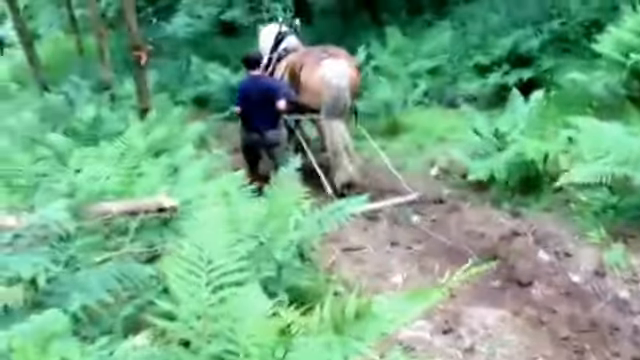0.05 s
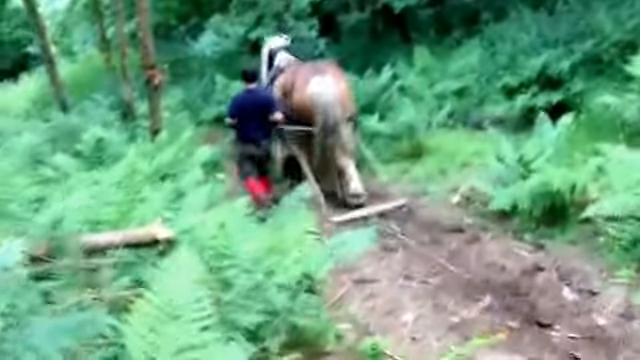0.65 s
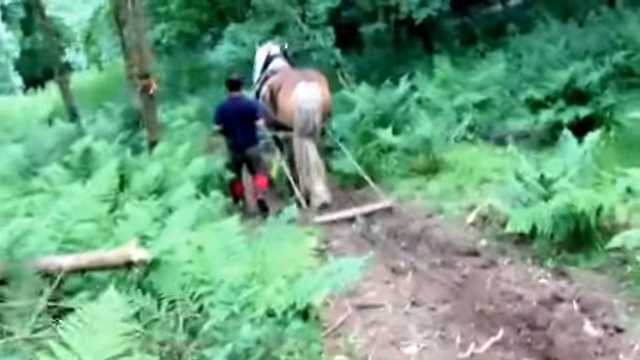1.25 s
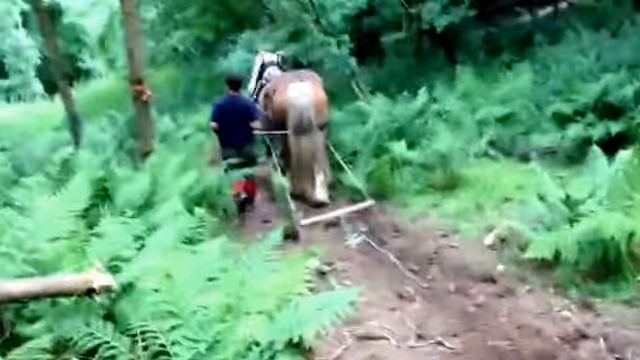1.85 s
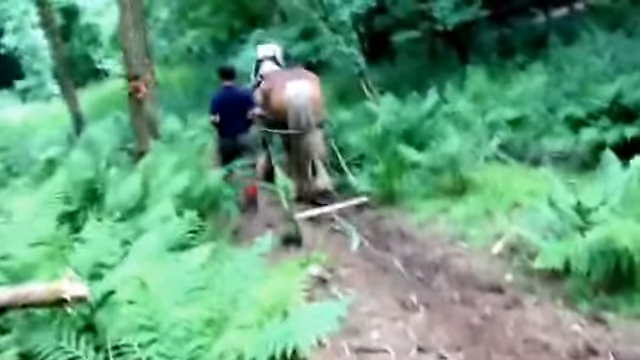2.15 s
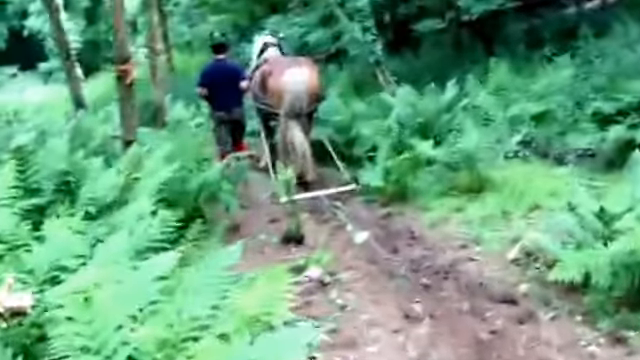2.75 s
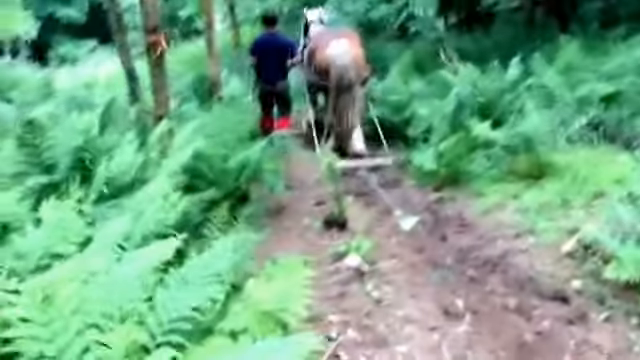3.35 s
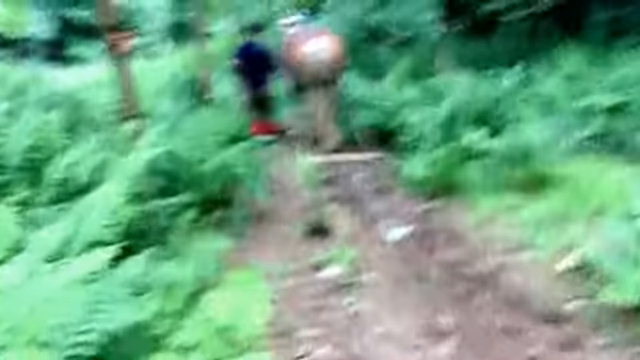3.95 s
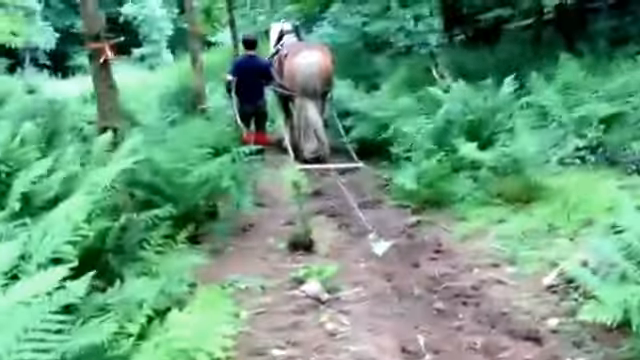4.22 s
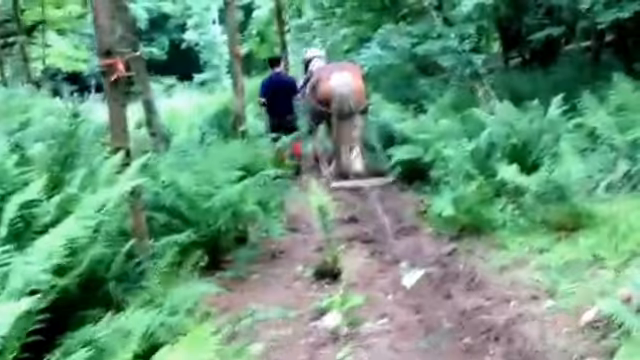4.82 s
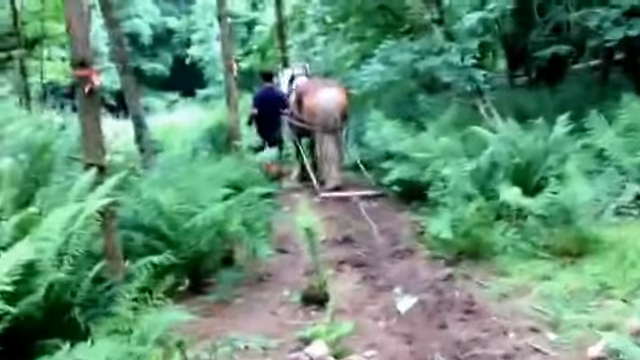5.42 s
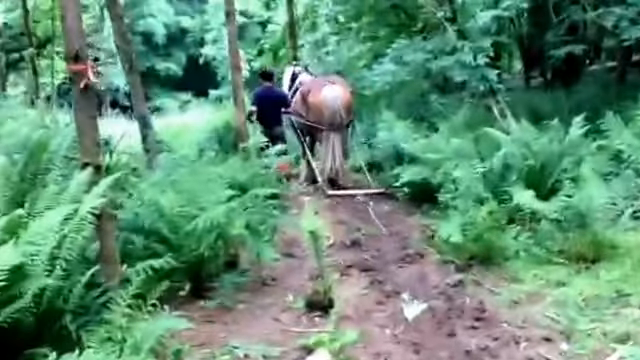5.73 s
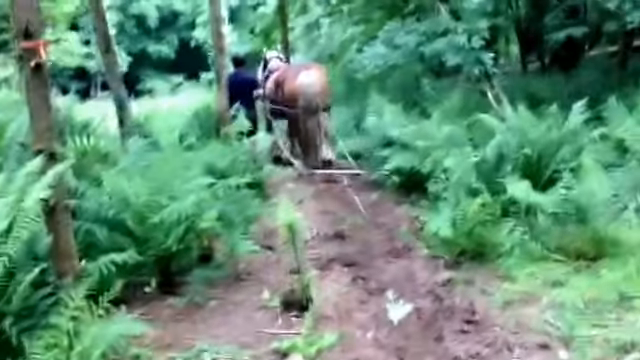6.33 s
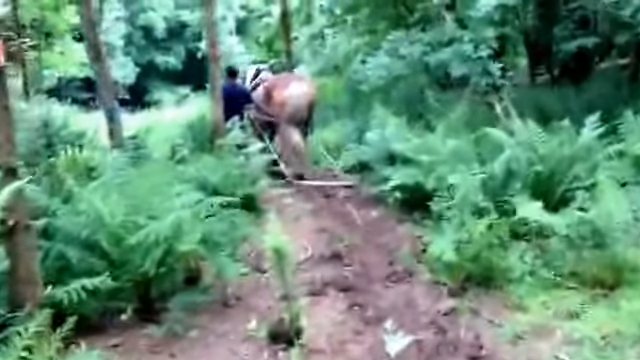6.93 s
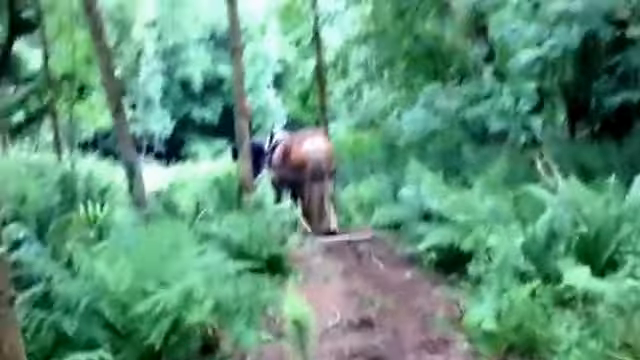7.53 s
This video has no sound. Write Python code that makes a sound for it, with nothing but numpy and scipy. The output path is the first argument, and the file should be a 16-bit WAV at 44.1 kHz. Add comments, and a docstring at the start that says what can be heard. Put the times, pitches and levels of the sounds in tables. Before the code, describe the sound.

A horse drags a wooden bar on chains along a woodland dirt track, moving away from the microphone. From the start, the bar and its iron hook clack irregularly on stones, with sharp knocks around 0.1, 0.8 and 1.7 seconds. Chain links rattle in quick, bright jerks, and a harness ring, clip and buckle add thin, high chimes. The jingling is busiest from about 1.6 to 3 seconds, peaking near 2.9. Underneath, hooves thud softly and unevenly on earth, and soil crunches under the sliding bar. After about 4 seconds the knocks and jingles become sparser and quieter. One louder cluster of wooden clacks and chain rattle comes at about 6.3 seconds, followed by faint thuds and a few light clinks until about 7.5 seconds. The trees give a slight, short echo, and leaves rustle faintly throughout.

```python
"""On a dirt track in a wood, a draught horse walks away, dragging a wooden spreader bar on trace chains.
Impacts on stones excite the resonances of the bar and its iron hook, and each blow ploughs up soil.
Chain links collide and ring as they swing; a harness ring, a clip and a buckle chime in free vibration.
Hooves thud on soft ground, and trunks scatter the sound over a faint rustle of leaves."""
import sys
import numpy as np
from scipy import signal
from scipy.fft import rfft, irfft
from scipy.io import wavfile
from scipy.ndimage import uniform_filter1d

SR = 44100
rng = np.random.default_rng(int(sys.argv[2]) if len(sys.argv) > 2 else 0)


def wav_record(signal):
    """Record a signal, one row per channel, as 16-bit PCM in the file named by sys.argv[1]."""
    frames = np.transpose(np.atleast_2d(signal))
    bounded = np.clip(frames, -1, 1)
    # unit amplitude maps onto the largest positive 16-bit level
    quanta = np.round(bounded * 32767).astype(np.int16)
    wavfile.write(sys.argv[1], SR, quanta)


N = 334278
TIME = np.arange(N) / SR

# Blows on stones. Each row: start in seconds, hook level in dB, bar level in dB, treble tilt in dB,
# chatter in dB. Levels in all tables are relative.
STONE_BLOWS = [(0.078, -44, -39, 8, -18), (0.133, -29, -32.5, 3, -12), (0.1991, -43, -36.5, -1, 13),
               (0.22, -34.5, -52, 0.5, -1), (0.235, -42, -37, -15, -3), (0.314, -34, -38, -9, -14.5),
               (0.6065, -40.5, -34, -14, -7), (0.636, -40, -46, -12, -8), (0.766, -37.5, -38.5, -2.5, 5),
               (0.8072, -39.5, -47, 2, 19), (0.835, -34, -48, 3, -4), (0.8468, -25.5, -36.5, -3.5, -18),
               (0.863, -34.5, -39.5, -0.5, 5), (0.9162, -33, -42, 1, 1), (1.293, -43, -47, -6, -16),
               (1.4014, -39.5, -49, 2.5, -18), (1.423, -32, -43.5, -2.5, -15), (1.455, -34, -45.5, -2, -28),
               (1.6337, -37, -43, -9.5, 8), (1.665, -39, -39, -6, -10), (1.703, -23.5, -34, -2.5, 17),
               (1.7828, -35, -59, -1.5, -19), (1.8733, -40, -53, -2, -4), (1.9618, -38.5, -56, 10, 1),
               (1.9943, -32.5, -53, 8, -2), (2.0065, -30, -39, -1, -1), (2.1171, -35, -47, -1.5, -1),
               (2.2716, -43.5, -50.5, -1.5, -1), (2.317, -35.5, -46.5, 1, 4), (2.365, -34.5, -45, 3.5, -8),
               (2.442, -41.5, -62, 5, -1), (2.8585, -33, -46, 5.5, -16), (2.8765, -30, -40, -4, -0.5),
               (2.9872, -35, -55, 6.5, -4), (3.004, -32, -47, 3.5, -4), (3.031, -38, -48, -12, -13),
               (3.0854, -36.5, -45, -8, -0.5), (3.4175, -37.5, -47.5, -7, -12),
               (3.4423, -37, -48.5, -4, -16), (3.4546, -33.5, -45, -2.5, -11), (3.5002, -37.5, -69, 5, 4),
               (3.5688, -38.5, -53, -1, -2), (3.653, -41, -53, -6, -6), (3.7486, -35, -48.5, -3, -6),
               (4.0665, -33, -44, 1.5, 0.5), (4.2663, -43.5, -54, 2.5, -8), (4.3055, -43.5, -61, 1.5, -7),
               (4.3802, -46, -51.5, -4, -13), (4.485, -38.5, -53, -8.5, -16), (4.7515, -56, -52.5, -7, -19),
               (4.9662, -50, -51.5, 10, -2), (4.9791, -50.5, -47.5, -13, 9), (5.172, -39.5, -43, -2, -1),
               (5.2168, -49, -46, -11, -9), (5.4462, -46, -50, 5, -16), (5.7215, -44.5, -43.5, 10, -1),
               (5.903, -51, -43, -9, -6), (6.2806, -41, -39, -13, -1), (6.3111, -37.5, -32.5, -1, -8),
               (6.3231, -39.5, -36, -11, 5), (6.3874, -48.5, -48, -13, 2), (6.533, -41, -49, -1.5, -23),
               (7.0472, -48.5, -52, -2.5, -5), (7.3413, -49, -42.5, -5, -9)]
# Modes of the wooden bar and of the iron hook. Each row: frequency in Hz, bandwidth in Hz, gain in dB.
BAR_MODES = [(190, 107, -6), (545, 75, 3.5), (624, 44, 4), (712, 100, 2), (975, 217, 0.5), (1400, 237, -2)]
HOOK_MODES = [(1840, 280, -4), (1847, 128, 4), (2720, 136, -1.5), (3232, 375, 8), (3654, 940, 2),
              (3973, 138, 7), (4170, 620, 0.5), (5050, 2870, -2.5)]
# Spectrum of scraping iron. Each row: frequency in Hz, level in dB.
SCRAPE_SPECTRUM = [(300, -14), (1400, -5), (3400, 2), (5000, 5), (6500, 1), (8200, -2.5), (10500, -8),
                   (14500, -14.5)]
def clacks(crack_s=0.0023, chatter_s=0.0098, rise_s=0.00037, hook_db=-1, bar_db=-1, rebound_db=-3):
    """Impact excitation: a hard contact and a flurry of rebounds drive the modes of bar and hook."""
    out, t = np.zeros(N), np.arange(SR // 8) / SR
    for s, iron_db, wood_db, bright_db, chatter_db in [*STONE_BLOWS, *hops(STONE_BLOWS), *pebbles()]:
        rebounds = unit(contacts(2500, 2.5, size=len(t)))
        chatter = undb(chatter_db + rebound_db) * np.exp(-t / chatter_s) * rebounds
        # a square blow is short and hardly chatters, a glancing one lasts longer
        contact_s = crack_s * undb(0.47 * np.clip(chatter_db, -12, 3))
        crack = np.exp(-t / contact_s) * rng.choice([-1, 1], len(t))
        force = (crack + chatter) * (1 - np.exp(-t / rise_s))
        bar = colour(modal_response(force, BAR_MODES),
                     [(70, -27), (170, -3.5), (260, -0.5), (370, -6.5), (560, -1.5),
                      (1500, -3), (4000, -18)])
        # the hook hangs differently at each blow, so its modes share the force differently
        hook_modes = [(hz, width, db + 2 * rng.standard_normal()) for hz, width, db in HOOK_MODES]
        iron = unit_onset(modal_response(force, hook_modes)) + unit_onset(colour(force, SCRAPE_SPECTRUM))
        # stone gives a brighter contact than soil
        tilt_db = np.clip(bright_db, -10, 10)
        iron = colour(iron, [(500, -28), (1500, -tilt_db), (2100, -tilt_db),
                             (4200, -4.5), (8400, tilt_db)])
        add(out, s, undb(iron_db + hook_db) * unit_onset(iron) + undb(wood_db + bar_db) * unit_onset(bar))
    return out


def hops(blows, flight_s=0.018, hop_db=-8.5):
    """Inelastic rebound: the bar lands again after each blow, the harder the more glancing the blow."""
    for s, iron_db, wood_db, bright_db, chatter_db in blows:
        loss_db = hop_db + min(chatter_db, 0.5)
        yield s + flight_s, iron_db + loss_db, wood_db + loss_db, bright_db, chatter_db + hop_db


def pebbles(per_s=4, start_m=9.5, walk_m_s=0.67, scatter_db=2.5, chatter_db=-5):
    """Spherical spreading: random blows on pebbles weaken as 1 / distance while the horse walks off."""
    count = int(per_s * N / SR)
    for k, (jitter, iron, wood, bright) in enumerate(rng.uniform(-1.1, 1, (count, 4))):
        s = (k + (1 + jitter) / 2) * N / SR / count
        spreading_db = -20 * np.log10(1 + walk_m_s * s / start_m)
        iron_db = -47.5 + spreading_db + scatter_db * iron
        wood_db = -51.5 + spreading_db + scatter_db * wood
        yield s, iron_db, wood_db, 7 * bright, chatter_db


# Jerks on the chains. Each row: start in seconds, level in dB.
CHAIN_JERKS = [(0.134, -33), (0.2155, -34.5), (0.477, -43), (0.5863, -34), (0.801, -34.5), (1.2107, -38),
               (1.4275, -45), (1.6378, -30), (1.754, -29), (1.8072, -35), (1.9606, -35), (2.006, -36),
               (2.0597, -34.5), (2.3286, -32.5), (2.4464, -32), (2.6, -37), (2.791, -34.5), (2.833, -27.5),
               (2.8616, -23), (2.955, -28.5), (2.982, -37), (3.6028, -31), (3.771, -43), (3.888, -45),
               (4.3, -47), (4.172, -45), (4.4474, -43), (4.604, -41.5), (5.1567, -45), (5.577, -46),
               (5.703, -43), (6.3048, -25.5), (6.3235, -29), (6.3935, -39), (6.7462, -47), (6.8018, -46.5),
               (7.279, -41)]
# Idle sway between jerks. Each row: time in seconds, level in dB.
CHAIN_SWAY = [(0.0, -51.5), (0.44, -59), (0.65, -58), (1.52, -62), (1.86, -49.5), (3.04, -63),
              (3.19, -58.5), (3.4, -76), (3.61, -55), (4.08, -63), (4.56, -59), (4.75, -74), (5.45, -64),
              (5.59, -54.5), (6.19, -71.5), (6.54, -55), (6.88, -72), (7.58, -64)]
# Modes of the links. Each row: frequency in Hz, level in dB, 60 dB decay time in seconds.
LINK_MODES = [(7280, -8, .07), (7364, -4, .14), (7438, 0, .13), (7490, -3, .08), (7560, -7, .06),
              (7655, 0, .12), (7700, -4, .07), (7790, -7, .07), (8050, -11, .05), (8348, -10, .12),
              (13038, -24, .15), (14200, -12, .14), (14380, -17, .1), (14659, -22, .15)]
def chains(knocks_per_s=45, jerk_db=-5, settle_s=0.02, tick_db=-9, tick_s=0.0013, rub_db=-12):
    """Collision and friction: swaying links knock and rub, and a jerk sets off a quick run of knocks."""
    sway, jerks = np.zeros(N), np.zeros(N)
    knocks = [chime(LINK_MODES, scatter_db=4, detune=0.004, seconds=0.2) for _ in range(96)]
    t = np.arange(len(knocks[0])) / SR
    # each knock opens with the dry tick of iron on iron
    for knock in knocks:
        tick = colour(rng.standard_normal(len(t)) * np.exp(-t / tick_s), SCRAPE_SPECTRUM)
        knock += undb(tick_db) * peak(knock) * tick / peak(tick)
    for s in rng.uniform(0, N / SR, rng.poisson(knocks_per_s * N / SR)):
        add(sway, s, undb(3.1 * rng.standard_normal()) * knocks[rng.integers(len(knocks))])
    for s, db in CHAIN_JERKS:
        run = np.zeros(SR // 3)
        for lag in np.append(0, np.minimum(rng.exponential(settle_s, size=4), 0.1)):
            i = int(lag * SR)
            run[i:i + len(t)] += np.exp(-lag / settle_s / 2) * knocks[rng.integers(len(knocks))]
        add(jerks, s, undb(db + jerk_db) * run / peak(run))
    slips = grains(per_s=500, spread_db=4.5, low_hz=1330, high_hz=8800, fade_s=0.00098)
    rub = steady(colour(slips, SCRAPE_SPECTRUM), 0.061)
    # each jerk leaves the chains swinging
    swing = stirred(CHAIN_SWAY, CHAIN_JERKS, swell_db=-7, rise_s=0.0082, fall_s=0.048)
    return (steady(sway, 0.079) + undb(rub_db) * rub) * swing + jerks


# Blows on the harness ring. Each row: start in seconds, level in dB, offset of the low modes in dB.
RING_BLOWS = [(0.0875, -30.5, -1), (2.1174, -37.5, -9), (2.3726, -41.5, -4), (2.853, -36.5, 1),
              (2.9415, -37, 6), (3.898, -44, -1), (4.0625, -35, -4.5), (4.4252, -46.5, 1.5),
              (4.4912, -52.5, 6), (5.163, -43.5, 6), (5.1934, -46, 6), (5.525, -57, 6), (6.5256, -55.5, 2),
              (6.646, -58, 6), (7.1457, -53, -2.5), (7.3322, -46.5, -4.5)]
# Modes of the ring. Each row: frequency in Hz, level in dB, 60 dB decay time in seconds.
RING_MODES = [(1637, -15, .5), (1943, -14, .4), (4387, -5, .28), (5683, 0, .27), (5913, -6, .24),
              (5990, -5, .24), (9383, -2, .13), (9530, -2, .14), (10055, -7, .17), (10150, -1, .12),
              (11203, -16, .15), (12613, -20, .18)]
def harness_ring(high_db=-2, low_db=-3, split_hz=8000):
    """Free vibration: the loose ring chimes, each blow weighting its high and low modes differently."""
    out, modes = np.zeros(N), np.array(RING_MODES)
    is_low = modes[:, 0] < split_hz
    for s, db, offset_db in RING_BLOWS:
        for band, band_db in ((modes[~is_low], high_db), (modes[is_low], low_db + offset_db)):
            ringing = chime(band, scatter_db=3, detune=0.0018, seconds=0.5)
            sound = rattle(ringing, bounce_s=0.016, bounce_db=-3.5)
            add(out, s, undb(db + band_db) * sound / peak(sound))
    return out


CLIP_BLOWS = [(0.232, -40), (0.3341, -45.5), (0.497, -42), (0.6406, -37), (0.7462, -36.5), (1.1253, -44.5),
              (1.1648, -46.5), (1.7645, -39), (2.0802, -42), (2.281, -41.5), (4.17, -41), (4.6853, -50),
              (4.7456, -50.5), (4.9573, -44.5), (5.082, -37.5), (5.8047, -38.5)]
BUCKLE_BLOWS = [(4.43, -52), (4.49, -52), (5.16, -48), (5.418, -49), (7.28, -50), (7.345, -52.5)]
# Their modes. Each row: frequency in Hz, level in dB, 60 dB decay time in seconds.
CLIP_MODES = [(8200, -13, 0.22), (8940, -4, 0.071), (8980, 3, 0.12), (9730, -2, 0.046), (10330, -18, 0.13)]
BUCKLE_MODES = [(2770, -7.5, 0.35), (4340, -10, .25), (7000, 6, 0.21), (8060, -8, .11), (14100, -8, .2),
                (15100, -13, .18)]
def clip_and_buckle(clip_db=-1, buckle_db=0):
    """Free vibration: small metal parts ring in high, inharmonic modes and rattle on their mounts."""
    out = np.zeros(N)
    for blows, modes, gain_db in ((CLIP_BLOWS, CLIP_MODES, clip_db),
                                  (BUCKLE_BLOWS, BUCKLE_MODES, buckle_db)):
        for s, db in blows:
            ringing = chime(modes, scatter_db=3.5, detune=0.003, seconds=0.35)
            sound = rattle(ringing, bounce_s=0.007, bounce_db=-7)
            add(out, s, undb(db + gain_db) * sound / peak(sound))
    return out


# Hooves and boots landing. Each row: start in seconds, level in dB, centre frequency in Hz.
FOOTFALLS = [(0.424, -39, 164), (0.917, -36, 280), (1.637, -35.5, 174), (2.663, -41.5, 175),
             (3.239, -44.5, 184), (3.521, -39, 74), (3.749, -37.5, 292), (4.058, -39.5, 300),
             (4.416, -42, 165), (4.9, -39.5, 140), (6.687, -50, 64), (6.917, -51, 55), (7.04, -48, 66.4)]
def hooves(gain_db=-2, decay_cycles=1.36, relative_width=1.68):
    """Heavy damping: soft soil takes the weight in a few low, uneven cycles."""
    out, t = np.zeros(N), np.arange(SR // 4) / SR
    for s, db, hz in FOOTFALLS:
        thud = np.exp(-t * hz / decay_cycles) * rng.standard_normal(len(t))
        for _ in range(4):
            thud = resonate(thud, hz, hz * relative_width)
        add(out, s, undb(db + gain_db) * thud / peak(thud))
    return out


# Crunch of the steady drag. Each row: time in seconds, level in dB.
SOIL_DRAG = [(0.0, -49), (0.55, -56.5), (0.8, -50), (1.03, -58.5), (1.29, -65), (1.58, -52), (2.28, -56),
             (2.57, -67), (2.83, -58.5), (3.0, -45.5), (3.12, -55.5), (4.39, -56), (4.68, -61.5),
             (5.11, -55), (5.24, -63), (6.42, -60), (6.82, -69), (7.58, -57.5)]
# Spectrum of crumbling soil. Each row: frequency in Hz, level in dB.
SOIL_SPECTRUM = [(90, -24), (180, 4), (260, 1.5), (360, -1.5), (600, 7), (1000, -4), (1700, -1), (3500, -7),
                 (6500, -5), (9000, -8), (15000, -17.5)]
def soil(wood_db=-7, slide_db=-8):
    """Brittle fracture: clods and twigs crumble under the sliding bar, which rings faintly with them."""
    crumbs = grains(per_s=150, spread_db=5.5, low_hz=1000, high_hz=7000, fade_s=0.0037)
    grit = unit(crumbs) + undb(slide_db) * rng.standard_normal(N)
    crunch = unit(colour(grit, SOIL_SPECTRUM)) + undb(wood_db) * unit(modal_response(grit, BAR_MODES))
    # each blow on a stone ploughs up more soil
    ploughing = stirred(SOIL_DRAG, STONE_BLOWS, swell_db=-13, rise_s=0.012, fall_s=0.044)
    return steady(crunch, 0.1) * ploughing


def trunks(x, near_db=-10, near_decay_s=0.011, far_db=-18, far_decay_s=0.062):
    """Scattering: ground and ferns reflect the sound at once, the trunks later and duller."""
    t = np.arange(SR * 3 // 4) / SR
    near = rng.standard_normal(len(t)) * np.exp(-t / near_decay_s) * (t > 0.002)
    far = contacts(1500, 1.7, size=len(t)) * np.exp(-t / far_decay_s) * (t > 0.02)
    far = colour(far, [(100, 4.5), (600, -4), (3500, 0), (8000, -10), (15000, 0)])
    echoes = undb(near_db) * near / np.linalg.norm(near) + undb(far_db) * far / np.linalg.norm(far)
    return x + signal.fftconvolve(x, echoes)[:N]


# Spectrum of the quiet forest. Each row: frequency in Hz, level in dB.
FOREST_SPECTRUM = [(15, -54), (25, -15), (219, -0.5), (394, -5.5), (558, -1), (769, -9), (2560, -15),
                   (4380, -9), (6540, -20.5), (7480, -23.5), (8780, -13), (13800, -20.5), (15000, -24.5)]
def forest(leaves_db=-61, air_db=-71, gust_db=4):
    """Flow noise: leaves rustle faintly and evenly, and light air rumbles in slow puffs."""
    leaves = unit(colour(rng.standard_normal(N), FOREST_SPECTRUM))
    gusts = np.interp(TIME, np.linspace(0, N / SR, 60), rng.standard_normal(60))
    rumble = resonate(resonate(rng.standard_normal(N), 59, 50), 59, 50)
    return undb(leaves_db) * leaves + undb(air_db) * unit(rumble * undb(gust_db * gusts))


def chime(modes, scatter_db, detune, seconds):
    """Modal superposition: damped sines whose strengths vary with the spot that is struck."""
    t = np.arange(int(seconds * SR)) / SR
    hz, db, t60 = np.transpose(modes)[:, :, None]
    spot, mistuning, side = rng.standard_normal((3, len(modes), 1))
    waves = np.sign(side) * np.sin(2 * np.pi * hz * (1 + detune * mistuning) * t)
    return np.sum(undb(db + scatter_db * spot - 60 * t / t60) * waves, axis=0)


def rattle(sound, bounce_s, bounce_db):
    """Repeated impact: a loose part bounces on its mount, each touch ringing anew and more weakly."""
    out = sound.copy()
    for k, lag in enumerate(np.cumsum(bounce_s * rng.uniform(0.3, 1.7, 4))):
        i = min(int(lag * SR), len(sound) - 1)
        out[i:] += undb(bounce_db * (k + 2.5)) * sound[:len(sound) - i]
    return out


def contacts(per_s, spread_db, size):
    """Poisson process: random tiny impacts, many weak and a few strong."""
    strength = undb(spread_db * np.minimum(rng.exponential(1, size), 3))
    return (rng.random(size) < per_s / SR) * strength * rng.choice([-1, 1], size)


def grains(per_s, spread_db, low_hz, high_hz, fade_s, kinds=96):
    """Shot noise: small snaps at random times, each kind with its own broad band and length."""
    out, t = np.zeros(N), np.arange(SR // 30) / SR
    fades = fade_s * 2 ** rng.uniform(-0.97, 1, kinds)
    snaps = [unit(resonate(rng.standard_normal(len(t)) * np.exp(-t / fade), hz, min(2 * hz, SR / 5)))
             for hz, fade in zip(np.geomspace(low_hz, high_hz, kinds), fades)]
    for when, kind, luck in rng.random((int(per_s * N / SR), 3)):
        strength = undb(spread_db * min(-np.log(1 - luck), 3))
        add(out, when * N / SR, strength * snaps[int(kind * kinds)])
    return out


def stirred(curve, events, swell_db, rise_s, fall_s):
    """Incoherent addition: a slow level curve and a swell after each event sum in power to a gain."""
    power = undb(np.interp(TIME, *np.transpose(curve))) ** 2
    t = np.arange(SR // 2) / SR
    swell = (1 - np.exp(-t / rise_s)) * np.exp(-t / fall_s)
    for s, db, *_ in events:
        add(power, s, (undb(db + swell_db) * swell) ** 2)
    return np.sqrt(power)


def modal_response(force, modes):
    """Forced vibration: the resonances of a body add with alternating sign."""
    return sum((-1) ** k * undb(db) * resonate(force, hz, width)
               for k, (hz, width, db) in enumerate(modes))


def resonate(x, hz, width):
    """Second-order resonance with gain 1 at its centre."""
    return signal.lfilter(*signal.iirpeak(min(hz, SR / 2 - 1), hz / width, fs=SR), x)


def colour(x, points):
    """Minimum-phase filter through (Hz, dB) points, built by folding the cepstrum."""
    hz, db = np.transpose(points)
    f = np.fft.rfftfreq(2048, 1 / SR)
    gain = undb(np.interp(np.log(f + 1), np.log(hz), db))
    cepstrum = irfft(np.log(gain))
    cepstrum[1:len(f) - 1] *= 2
    cepstrum[len(f):] = 0
    return signal.fftconvolve(x, irfft(np.exp(rfft(cepstrum))))[:len(x)]


def steady(x, seconds):
    """Division by the running rms evens out the slow level and keeps the grain."""
    power = uniform_filter1d(x ** 2, int(seconds * SR))
    return x / np.sqrt(np.abs(power) + np.mean(x ** 2) / 20)


def peak(x):
    """Highest rms over 2 ms."""
    return np.sqrt(uniform_filter1d(x ** 2, 88).max())


def unit_onset(x):
    """Normalisation to rms 1 over the first 12 ms."""
    return x / np.sqrt(np.mean(x[:530] ** 2))


def unit(x):
    """Normalisation to rms 1."""
    return x / np.sqrt(np.mean(x ** 2))


def undb(db):
    """Decibels to amplitude ratio."""
    return 10 ** (np.asarray(db) / 20)


def add(track, s, sound):
    """Superposition of a sound on a track at s seconds."""
    i = max(int(s * SR), 0)
    track[i:i + len(sound)] += sound[:max(N - i, 0)]


def scene():
    """Linear superposition: load, harness and horse, their echoes, and the forest behind them."""
    team = clacks() + chains() + harness_ring() + clip_and_buckle() + hooves() + soil()
    return (trunks(team) + forest())[None]


def record(dry, top_hz=15500):
    """Band limiting: a steep elliptic low-pass cuts the highest treble."""
    return signal.sosfilt(signal.ellip(10, 0.2, 80, top_hz, fs=SR, output="sos"), dry)


dry = scene()
out = record(dry)
wav_record(out)
```